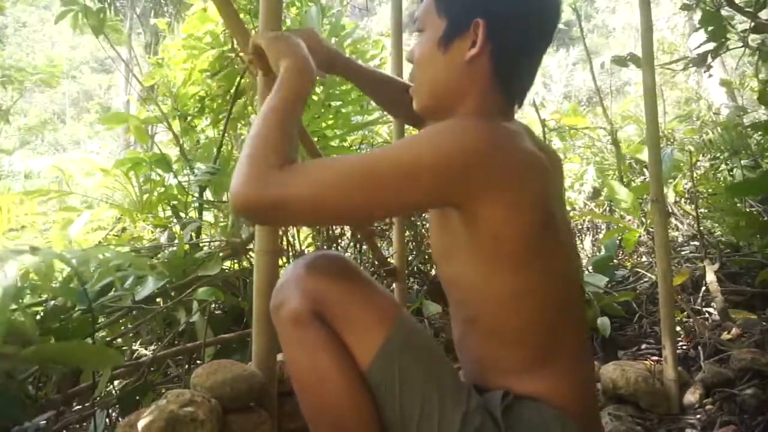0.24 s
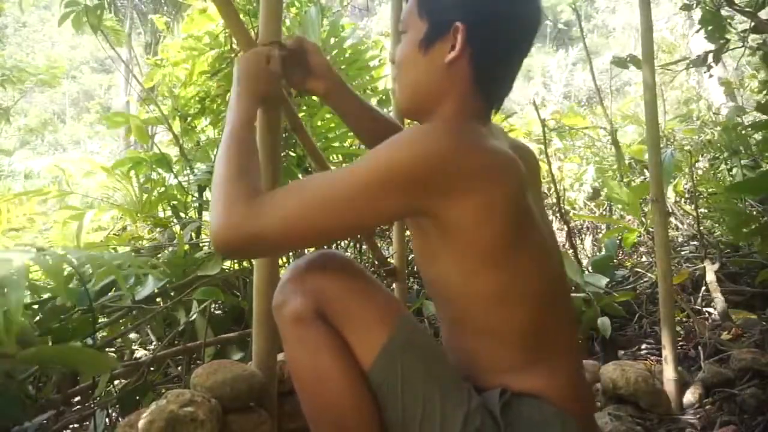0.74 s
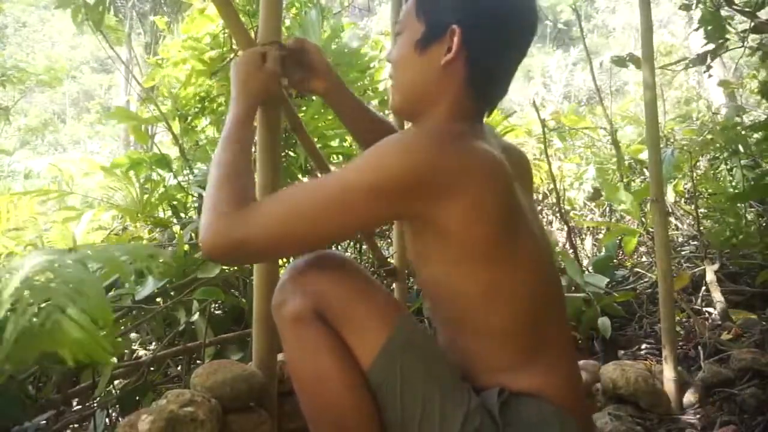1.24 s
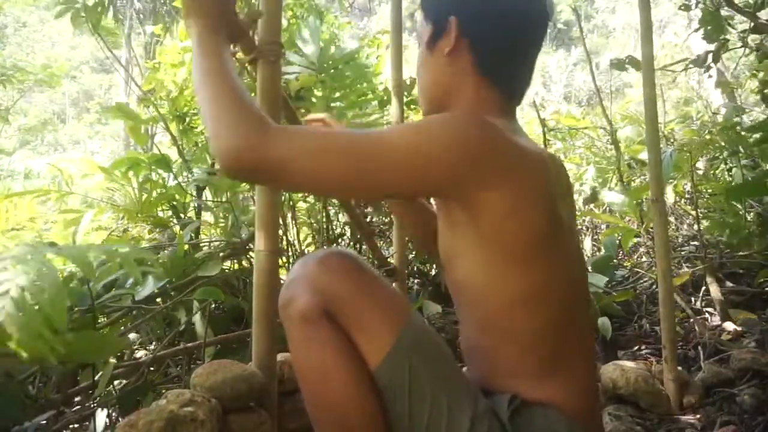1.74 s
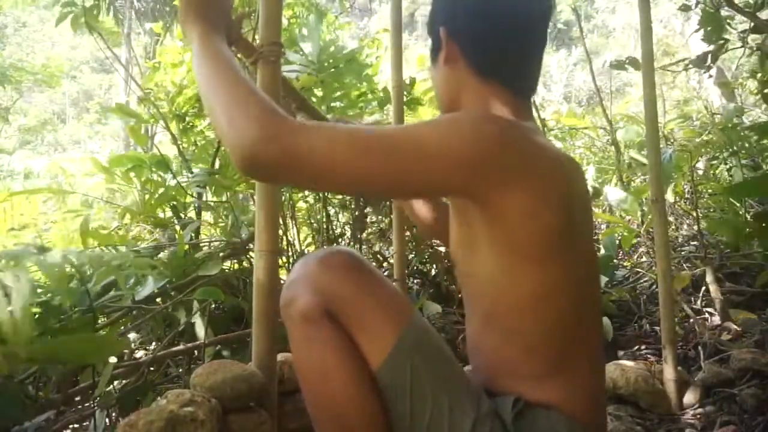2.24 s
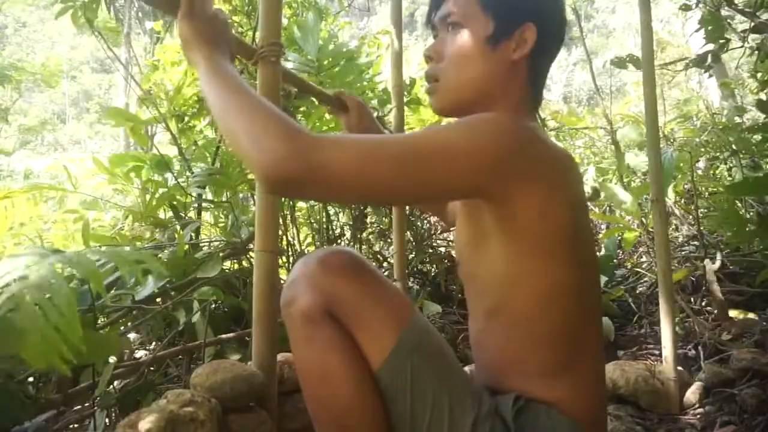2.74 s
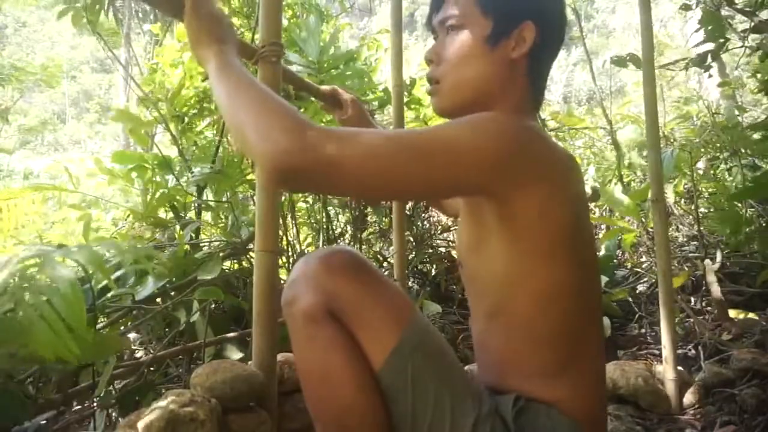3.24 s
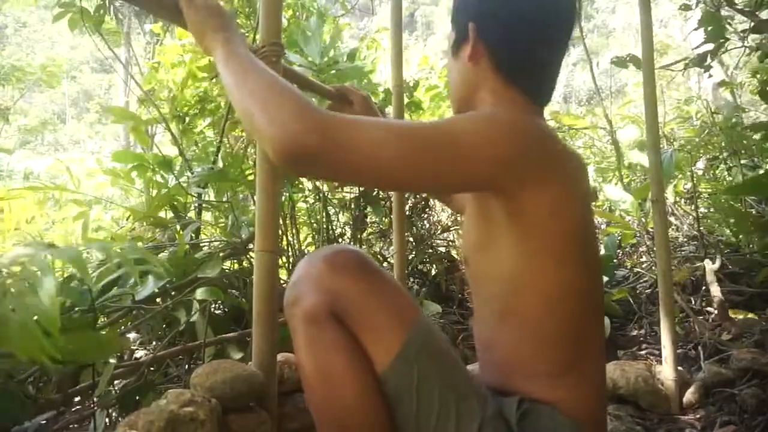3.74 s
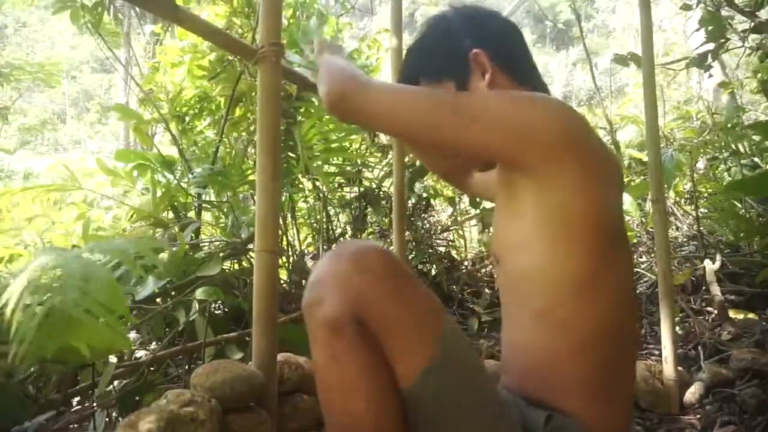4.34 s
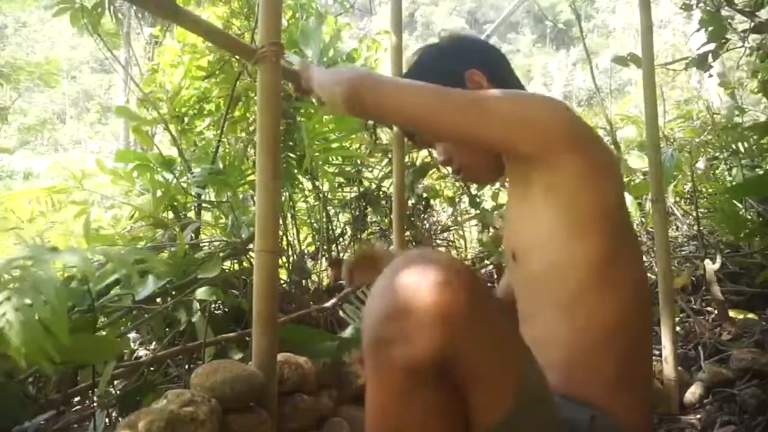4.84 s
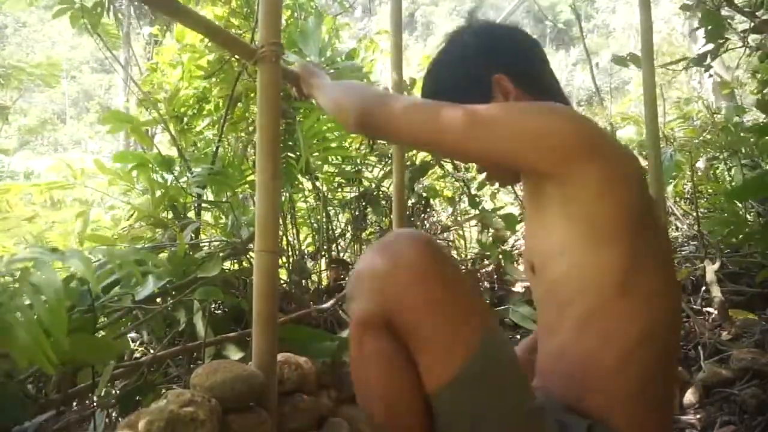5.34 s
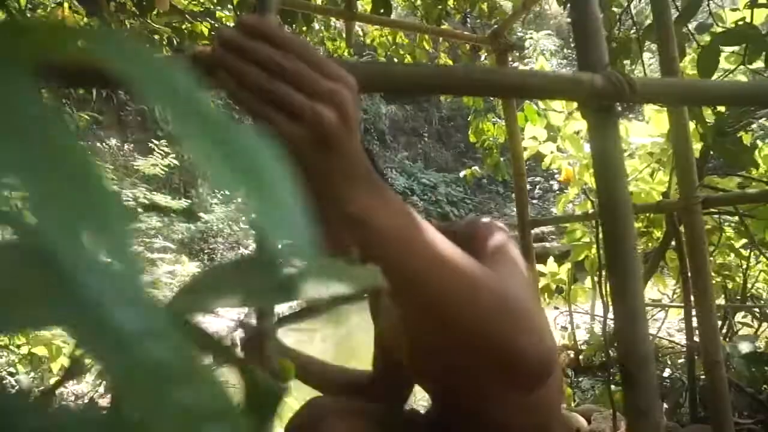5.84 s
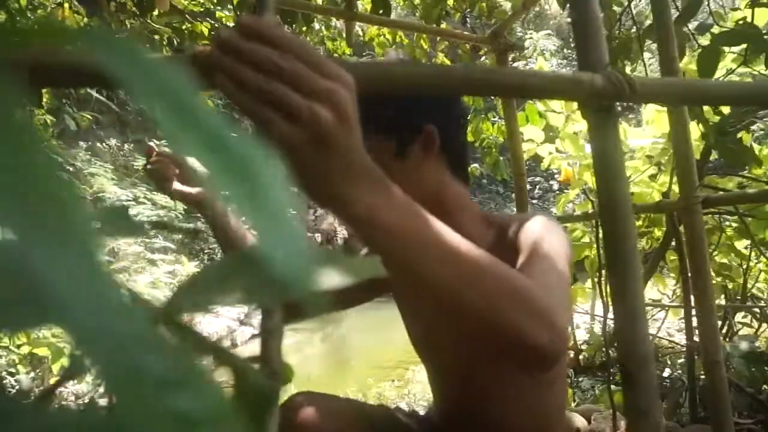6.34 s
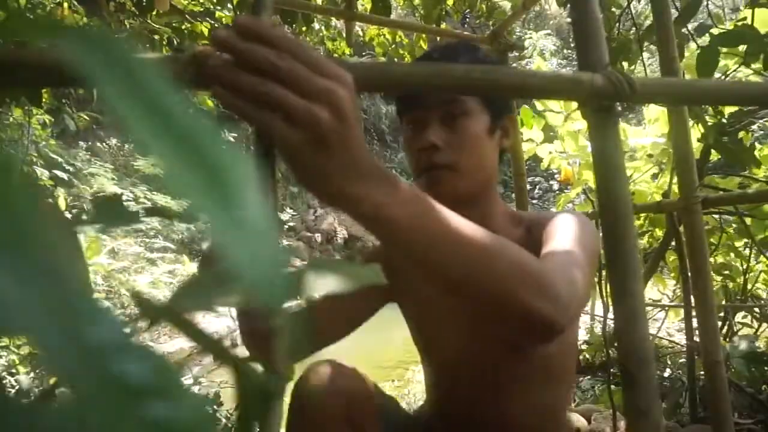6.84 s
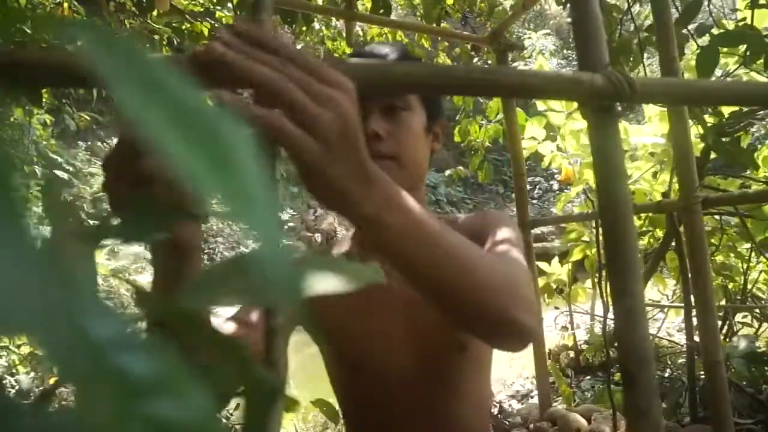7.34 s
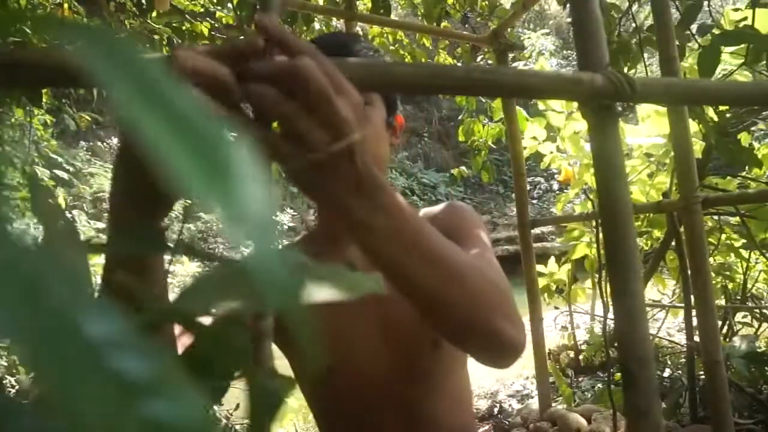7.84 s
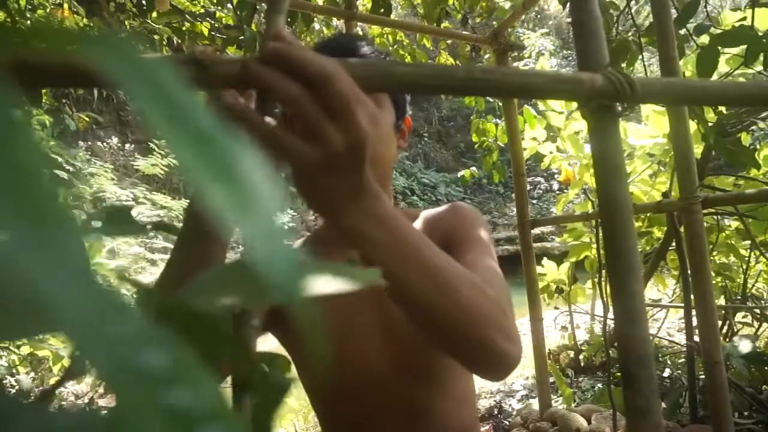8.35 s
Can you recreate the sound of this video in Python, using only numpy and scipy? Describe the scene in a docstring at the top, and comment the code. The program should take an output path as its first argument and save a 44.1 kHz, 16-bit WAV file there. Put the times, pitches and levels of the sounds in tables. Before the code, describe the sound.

A bright, gurgling stream runs throughout, swelling gently until about 4.3 s. Low puffs of air thump on the microphone in the first 0.2 s. Faint bamboo ticks come from 0.8 to 1.3 s. A binding strip rasps briefly at 1.9 s, harder with a rising groan at 2.0 s, then in a longer hissing pull from 2.3 to 2.95 s, with small knocks between. The loudest dry, hollow bamboo knock lands at 3.1 s with a leaf rustle, another at 3.6 s. A distant animal trills softly near 3.2 and 4.1 s. Leaves stir around 5 s and a foot scuffs grittily at 5.3-5.5 s. At 5.86 s the stream suddenly becomes softer, wider and farther right. Leaves crackle and twigs snap densely from 6.7 to 7.5 s, with a bamboo clack at 7.14 s. A lighter knock and another faint trill come at 7.8 s, then slight rustles over water until 8.6 s.

```python
"""Bamboo lashed by hand beside a forest stream

Struck poles ring as damped modes under noise cracks; a binding strip rasps in three strokes of stick-slip noise.
Dry leaves crackle as filtered random impulses, twigs snap as short noise bursts, and a foot drags on the litter.
A stream of noise and rising bubble tones turns softer, wider and further right at 5.86 s.
A far animal trills in pulsed tones, and puffs of air thump on the microphone as low-frequency noise."""
import sys
import numpy as np
from scipy import signal
from scipy.fft import rfft, irfft, next_fast_len
from scipy.io import wavfile
from scipy.ndimage import uniform_filter1d, map_coordinates

SR = 44100
rng = np.random.default_rng(int(sys.argv[2]) if len(sys.argv) > 2 else 0)


def bounce(signal):
    """Save signal as a 16-bit WAV file at the path given by the first command-line argument."""
    frames = np.transpose(np.atleast_2d(signal))
    limited = np.clip(frames, -1, 1)
    pcm = np.round(limited * 32767).astype(np.int16)
    wavfile.write(sys.argv[1], SR, pcm)


N = 378378

# spectrum of dry litter, for leaves, twigs and foot: f/Hz, relative spectral level/dB
LITTER = [(100, -54), (280, -45), (700, -9), (1400, -1), (2000, -6), (2700, 0.5), (3800, -5), (5500, -8.5),
          (8000, -8.5), (11000, -9.5)]


def amp(db):
    """Amplitude ratio from decibels: 20 dB per factor of ten."""
    return 10 ** (np.asarray(db) / 20)


def unit(x):
    """Normalisation to an rms of 1."""
    return x / np.sqrt(np.mean(x ** 2) + 1e-20)


def hold(x, span_s):
    """Normalisation to an rms of 1 over the onset alone."""
    x = unit(x)
    return x / np.sqrt(np.mean(x[:, :round(span_s * SR)] ** 2))


def since(s):
    """Time axis: seconds since time s, for every sample."""
    return np.arange(N) / SR - s


def bell(s, half_s):
    """Gaussian envelope of height 1 at time s, with standard deviation half_s."""
    return np.exp(-.5 * (since(s) / half_s) ** 2)


def surge(s, rise_s, fall_s):
    """Exponential growth to 1 at time s and exponential decay after it, given as time constants."""
    t = since(s)
    return np.exp(-np.minimum(np.maximum(-t / rise_s, t / fall_s), 20))


def wobble(rate):
    """Smooth random modulation of rms 1: a spline through rate random knots a second."""
    knots = rng.standard_normal(int(N * rate / SR) + 4)
    return unit(map_coordinates(knots, [np.arange(N) * rate / SR]))


def along(points, hz):
    """Interpolation of (f/Hz, value) points on a logarithmic frequency axis."""
    f, value = np.transpose(points)
    return np.interp(np.log(hz + 1), np.log(f), value)


def filtered(x, response):
    """Linear filtering: the spectrum is multiplied by a response of frequency."""
    n = x.shape[-1]
    padded = next_fast_len(n + SR // 8)
    return irfft(rfft(x, padded) * response(np.fft.rfftfreq(padded, 1 / SR)), padded)[..., :n]


def band(x, edge_hz, kind):
    """Causal third-order Butterworth low, band or high pass."""
    return signal.sosfilt(signal.butter(3, edge_hz, kind, fs=SR, output="sos"), x)


def spread(pair, spectrum, width=1):
    """Partial coherence: two unrelated signals mix as mid and side into coloured stereo of rms 1."""
    # left-right correlation at width 1: f/Hz, correlation
    likeness = [(60, 0.85), (130, 0.81), (270, 0.69), (580, 0.56), (1220, 0.38), (2600, 0.67),
                (5520, 0.025), (11700, 0.7)]

    def mid_side(hz):
        angle = width * np.arccos(np.clip(along(likeness, hz), -1, 1)) / 2
        return amp(along(spectrum, hz)) * np.array([np.cos(angle), np.sin(angle)])

    mid, side = filtered(pair, mid_side)
    return unit(np.array([mid + side, mid - side]))


def ticks(rate, scatter_db):
    """Shot noise: two random trains of impulses of uneven size, rate a second."""
    present = rng.random((2, N)) < rate / SR
    size = rng.standard_normal((2, N)) * amp(scatter_db * rng.standard_normal((2, N)))
    return unit(present * size)


def narrow(hz, width_hz, side_share):
    """Narrow-band noise: slow complex noise shifted up to the frequency curve hz."""
    drive = rng.standard_normal((2, N)) + 1j * rng.standard_normal((2, N))
    slow = signal.sosfilt(signal.butter(2, width_hz / 2, fs=SR, output="sos"), drive)
    mid, side = np.real(slow * np.exp(2j * np.pi * np.cumsum(hz * np.ones(N)) / SR))
    return unit(np.array([mid + side_share * side, mid - side_share * side]))


def resonant(x, modes):
    """Modal filtering: a body's (f/Hz, bandwidth/Hz, level/dB) resonances in parallel, at rms 1."""
    def body(f):
        total = 0
        for k, (centre, width, db) in enumerate(modes):
            peak = 1j * f * width / (centre * centre - f * f + 1j * f * width)
            total = total + (-1) ** k * amp(db) * peak  # neighbours in opposite phase
        return total

    return unit(band(filtered(x, body), 1340, "high"))


def patchy(x, depth_db):
    """Time-frequency modulation: narrow bands swell and fade as the contact moves."""
    z = signal.stft(x, nperseg=512)[2]
    field = uniform_filter1d(rng.standard_normal(z.shape[1:]), size=3, axis=0)
    field = uniform_filter1d(field, size=13, axis=1)
    return unit(signal.istft(z * amp(depth_db * unit(field)), nperseg=512)[1][:, :N])


def add(track, s, sound):
    """Superposition of a sound onto a track at time s."""
    part = track[:, round(s * SR):][:, :sound.shape[-1]]
    part += sound[..., :part.shape[-1]]


def poles():
    """Modal impact: each blow cracks and rings the cane, and the hands damp it more or less."""
    # blows on the poles: t/s, level/dB, hollow low ring/dB, splintery treble/dB, decay T60/s,
    # note of the struck spot f/Hz, left over right/dB
    blows = [(0.793, -37, -22, -8, 0.011, 2250, 0), (0.893, -33, -15, -29, 0.02, 2850, -1),
             (.9501, -40, -7, -10, 0.024, 4000, 0), (1.075, -29.5, -9, -10, 0.026, 3100, 1),
             (1.286, -37.5, -13, -2, 0.016, 4540, -5), (2.0392, -26, -15, -18, 0.0075, 2290, 0),
             (2.331, -33, -8.5, -16, 0.027, 2370, 0), (3.139, -14.5, -2.5, -24, 0.043, 2590, 3),
             (3.5889, -20, -7, -9.5, 0.058, 3720, 0.5), (4.558, -34.5, -15, -16, 0.11, 5500, 0),
             (5.945, -38, -11, -6.5, 0.046, 2290, 0), (7.1361, -20.5, -14.5, -9.5, 0.0096, 2510, 0.5),
             (7.1518, -33, -7, 3.5, 0.037, 2700, 0), (7.245, -32.5, -20, 0.5, 0.022, 3860, 0),
             (7.3366, -40, -9, 9.5, 0.037, 2450, 1), (7.811, -27, -8, -3, 0.026, 2100, -1)]
    # modes of the hollow cane: f/Hz, mean level/dB, ring time as a share of the blow's T60
    cane_modes = [(287, -17.5, 1.5), (413, -21, 3), (755, -2, 1.44), (940, 5, 0.81), (1090, 2.5, 1.04),
                  (1277, 2.5, 0.96), (1633, 3, 0.65), (2002, 8.5, 2.2), (2260, 20, 1.1), (2424, 16, 1.1),
                  (2630, 18, 1.1), (2737, 17, 0.47), (2953, 15, 1.04), (3720, 19.5, 0.74), (4280, -26, .8)]
    # noise of the crack: f/Hz, relative spectral level/dB
    crack_spectrum = [(150, -23), (500, -7.5), (1200, -14.5), (2500, 7), (4000, 1), (5200, -0.5),
                      (7000, -16), (8500, -10.5), (10600, -14)]
    out, t = np.zeros((2, N)), np.arange(SR // 5) / SR
    strength = lambda x: hold(x, span_s=.01)
    hz, mode_db, share = np.transpose(cane_modes)[:, :, None]
    for s, db, hollow_db, splinter_db, t60, spot_hz, pan_db in blows:
        size = amp(mode_db + rng.normal(0, 1.5, hz.shape))
        # phases differ slightly between left and right
        phase = rng.uniform(0, 2 * np.pi, hz.shape) + rng.normal(0, 0.14, (2, len(hz), 1))
        modes = size * amp(-60 * t / (t60 * share)) * np.sin(2 * np.pi * hz * t + phase)
        ring = np.sum(modes, axis=1)
        crack = spread(rng.standard_normal((2, len(t))), crack_spectrum, width=0.87) * amp(-60 * t / t60)
        # a longer contact also takes longer to build up
        build = 1 - np.exp(-t / (.015 * t60))
        blow = (strength(ring) + 1.06 * strength(crack)) * build
        # only a heavy blow reaches the deepest modes
        lowest_hz = np.interp(db, [-22, -16], [640, 330])
        hollow = band(blow, [lowest_hz, 1450], "band")
        wall = band(blow, [1600, 3700], "band")
        spot = band(crack, [spot_hz * .92, spot_hz * 1.08], "band")
        splinter = band(crack, 6000, "high")
        sound = 0.74 * strength(wall) + 0.51 * strength(spot)
        sound = sound + amp(hollow_db) * strength(hollow) + amp(splinter_db) * strength(splinter)
        add(out, s, amp(db + np.array([[pan_db], [-pan_db]]) / 2) * sound)
    return out


def strip():
    """Stick-slip friction: catching fibres excite the cane while the strip is hauled round the joint."""
    # slack taken up, a hard haul, the tail drawn through: t/s, length/s, rasp level/dB,
    # rasp change over the stroke/dB, hiss level/dB, hiss change/dB, groan level/dB, starting f/Hz, rise/Hz
    strokes = [(1.878, 0.11, -34.5, -36, -41.5, 0, -70, 2300, -2),
               (2.035, 0.28, -33.5, 10, -30.5, 1, -34.5, 1880, 760),
               (2.34, .61, -52, 19.5, -33.5, -6, -60, 2290, 199.5)]
    # noise of the fibres: f/Hz, relative spectral level/dB
    fibre_spectrum = [(200, -41), (600, -13), (1200, -10), (2000, -5), (3300, -7.5), (4700, -1.5),
                      (6500, -8), (8500, -6.5), (10600, -3.5)]
    # resonances of the cane under the strip: f/Hz, bandwidth/Hz, level/dB
    rubbed_modes = [(1290, 150, -12), (1790, 140, -6), (2205, 80, 6), (2590, 230, 5), (3220, 450, 2.5),
                    (3840, 500, -4), (4370, 150, -7.5), (5430, 200, -31)]
    grip_s, let_go_share = 0.0069, 0.28  # a stroke bites at once and eases off over its last part
    groan_fade_db = 12  # the pole groans less as the strip tightens over a stroke
    rasp_gain, hiss_gain, groan_gain, hz = np.zeros((4, N))
    for s, length, rasp_db, rasp_change_db, hiss_db, hiss_change_db, groan_db, start_hz, rise_hz in strokes:
        tension = np.clip(since(s) / length, 0, 1)
        grip = np.clip(since(s) / grip_s, 0, 1)
        sliding = grip * np.sqrt(np.clip((1 - tension) / let_go_share, 0, 1))
        rasp_gain = rasp_gain + sliding * amp(rasp_db + rasp_change_db * tension)
        hiss_gain = hiss_gain + sliding * amp(hiss_db + hiss_change_db * tension)
        groan_gain = groan_gain + sliding * amp(groan_db - groan_fade_db * tension)
        hz = np.where((since(s) > 0) | (hz == 0), start_hz + rise_hz * tension, hz)
    catch = amp(0.65 * wobble(110))

    def fibres():
        scrape = spread(ticks(rate=12000, scatter_db=-2.0), fibre_spectrum, width=0.7)
        return patchy(scrape, depth_db=4.5)

    free_length = narrow(hz, width_hz=430, side_share=.35)
    rasp = unit(band(free_length, 1350, "high") + 1.8 * resonant(fibres(), rubbed_modes))
    groan = narrow(hz=1366, width_hz=170, side_share=0.23)
    return catch * (rasp_gain * rasp + hiss_gain * fibres() + groan_gain * groan)


def stirring():
    """Incoherent addition: the rustles' envelopes add in power to one measure of leaf movement."""
    # leaves brushed by the body or shaken by the poles: peak t/s, level/dB, rise and fall time constants/s
    rustles = [(3.15, -32, .005, .07), (4.95, -42, .35, 0.38), (5.33, -37, .045, .05),
               (6.774, -35, .03, .04), (6.9, -35.5, .018, .19), (7.035, -34.5, .015, .05),
               (7.14, -30.5, .035, .2), (7.375, -39, .01, .1), (7.66, -41, .035, 0.038),
               (8.26, -45, .05, .07), (8.5, -48.5, 0.092, .3)]
    return np.sqrt(sum((amp(db) * surge(s, rise, fall)) ** 2 for s, db, rise, fall in rustles))


def leaves():
    """Crackling noise: fine and sharper random impulses in clumps over a soft brushing noise."""
    fine, sharp = ticks(rate=3000, scatter_db=1), ticks(rate=400, scatter_db=0)
    crackle = fine + .7 * sharp + .6 * rng.standard_normal((2, N))
    return stirring() * amp(2.4 * wobble(80)) * patchy(spread(crackle, LITTER), depth_db=3.0)


def small_snaps(count):
    """Random events of varying rate: lesser snaps fall most often where the leaves move hardest."""
    body_over_db, treble_over_db, scatter_db = 15, -1, 1.5  # first two relative to the rustle
    stir = stirring()
    work_done = np.cumsum(stir ** 2) / np.sum(stir ** 2)
    share = (np.arange(count) + rng.random(count)) / count
    at = np.searchsorted(work_done, share).clip(0, N - 1)
    db = 20 * np.log10(stir[at]) + scatter_db * rng.standard_normal(count)
    return list(zip(at / SR, db + body_over_db, db + treble_over_db))


def twigs():
    """Brittle fracture: short dry noise bursts that decay without a ring."""
    # the loudest snaps, levels ahead of the mixing gains: t/s, body level/dB, treble level/dB
    loud_snaps = [(2.7226, -18, -45), (6.7358, -16, -38), (6.8264, -21, -36), (6.887, -19, -44),
                  (7.0257, -12.5, -32), (7.106, -15.5, -32), (7.1968, -16.5, -38), (7.2087, -22, -26),
                  (7.2249, -21, -31), (7.3038, -19, -42), (7.3738, -16, -46), (7.4687, -18, -38)]
    out, t = np.zeros((2, N)), np.arange(SR // 16) / SR
    for s, db, treble_db in [*loud_snaps, *small_snaps(count=26)]:
        burst = spread(rng.standard_normal((2, len(t))), LITTER, width=0.79)
        body = unit(band(burst, [500, 4500], "band")) * amp(-60 * t / 0.028)  # T60 in s
        treble = unit(band(burst, 6100, "high")) * amp(-60 * t / 0.041)
        add(out, s, 0.22 * amp(db) * body + 0.92 * amp(treble_db) * treble)
    return out


def foot():
    """Granular friction: a foot's gritty, slightly squeaky drag excites resonances of the litter."""
    # drags over the litter: t/s, level/dB, standard deviation in time/s
    drags = [(5.323, -37, 0.054), (5.5, -40.5, 0.024)]
    # resonances of the litter under the foot: f/Hz, bandwidth/Hz, level/dB
    scuff_modes = [(2580, 110, 5), (3040, 200, 1), (4000, 310, 3.5), (4600, 180, -10), (4760, 240, 5),
                   (8100, 320, 1.5), (10030, 400, -2), (10160, 300, 4.5)]
    pressure = sum(amp(db) * bell(s, half) for s, db, half in drags)
    grit = spread(ticks(rate=4000, scatter_db=1), LITTER)
    return pressure * amp(1.7 * wobble(60)) * resonant(grit, scuff_modes)


def nearby(x):
    """Comb filtering: early reflections from poles and stones give fixed peaks and dips."""
    # reflections: delay at left t/s, delay at right t/s, gain
    reflections = [(.0019, .0021, 0.052), (.0034, .0033, 0.0099), (.0056, .0058, .25), (.0093, .0088, 0.14)]
    out = x.copy()
    for left_s, right_s, gain in reflections:
        out += gain * np.array([np.roll(side, round(d * SR)) for side, d in zip(x, (left_s, right_s))])
    return out / np.sqrt(1 + np.sum(np.transpose(reflections)[2] ** 2))


def forest(x):
    """Diffuse scattering: stems and foliage add a short tail whose decay depends on frequency."""
    # reverberation: f/Hz, T60/s
    decay = [(200, 0.27), (1000, 0.06), (2700, 0.1), (6000, 0.24), (11000, 0.072)]
    hz, t, z = signal.stft(rng.standard_normal((2, SR // 2)), SR, nperseg=256)
    tail = signal.istft(z * amp(-60 * t / along(decay, hz)[:, None]), SR, nperseg=256)[1]
    return signal.fftconvolve(x, tail / np.linalg.norm(tail[0]), axes=1)[:, :N]


def bubbles(count, pitch_hz, cycles):
    """Bubble resonance: small bubbles ring briefly with rising pitch, starting at pitch_hz to 6 pitch_hz."""
    out, t = np.zeros((2, N)), np.arange(SR // 50) / SR
    for when, size, side, pitch in rng.random((count, 4)):
        hz = pitch_hz * 6 ** pitch
        age = t * hz / cycles
        tone = age * np.exp(-3 * age) * np.sin(2 * np.pi * hz * t * (1 + 0.061 * age))
        add(out, when * (N - 1) / SR, size ** 3 * np.array([[side], [1 - side]]) * tone)
    return unit(out)


def water(levels, splash_db, width, gurgle_right_db, splash_right_db):
    """Turbulent flow noise with entrained bubbles: the splash swells less than the gurgle."""
    # f/Hz, relative spectral level/dB
    gurgle_spectrum = [(25, -58), (60, -29), (140, -23.5), (220, -19), (300, -7.5), (400, -0.5), (600, 1),
                       (1200, 3.5), (1700, -3), (3000, -8.5), (6000, -51)]
    splash_spectrum = [(100, -66), (400, -35), (1000, -23), (1600, -6.5), (2300, -3), (2750, -4),
                       (3300, -6.5), (4500, -9), (6500, -14.5), (9000, -17), (11000, -19)]
    gurgle_db, splash_follows = 2, 0.42  # gurgle over the level; share of the swell the splash follows
    level_db = np.interp(since(0), *np.transpose(levels))
    swell_db = level_db - np.mean([db for s, db in levels])

    def flow(spectrum, right_db):
        noise = rng.standard_normal((2, N)) + 0.33 * ticks(rate=1500, scatter_db=2.5)
        return amp([[-right_db], [right_db]]) * spread(noise, spectrum, width)

    gurgle = flow(gurgle_spectrum, gurgle_right_db) + 0.27 * bubbles(count=2500, pitch_hz=415.6, cycles=9.3)
    splash = flow(splash_spectrum, splash_right_db)
    gurgle_gain = amp(level_db + gurgle_db + 0.95 * wobble(14))
    splash_gain = amp(splash_db + splash_follows * swell_db + 0.7 * wobble(11))
    return gurgle_gain * gurgle + splash_gain * splash


def stream():
    """Equal-power crossfade: from the second listening spot the stream is softer, wider and to the right."""
    # base level of the water at each spot: t/s, level/dB
    first_levels = [(0.4, -50), (1.86, -48.5), (2.12, -47), (4.3, -44), (5.6, -46.5)]
    second_levels = [(5.9, -52.5), (8.58, -50)]
    move_s, fade_s = 5.86, .01
    moved = np.clip(since(move_s) / fade_s, 0, 1) * np.pi / 2
    first = water(first_levels, splash_db=-39.0, width=1.0, gurgle_right_db=0.5, splash_right_db=0)
    second = water(second_levels, splash_db=-42.5, width=1.2, gurgle_right_db=1.9, splash_right_db=0.56)
    return np.cos(moved) * first + np.sin(moved) * second


def trill():
    """Amplitude modulation: soft hoots roll, strong and weak in turn, half blurred by the trees."""
    # a far animal's calls: peak t/s, level/dB, top f/Hz
    calls = [(3.2, -51.5, 770), (4.08, -47, 744.6), (7.82, -47.5, 790)]
    rise_s, fall_s = .32, .8  # time constants
    climb_hz_per_s, sag_hz_per_s = 160, 90
    gains = np.array([amp(db) * surge(s, rise_s, fall_s) for s, db, _ in calls])
    # each call climbs as it swells and sags as it fades
    peak_s, _, top_hz = np.array(calls)[gains.argmax(axis=0)].T
    hz = top_hz - np.maximum(-climb_hz_per_s * since(peak_s), sag_hz_per_s * since(peak_s))
    beat = 28.8 * since(0) + .06 * wobble(9)  # hoots a second, slightly uneven
    roll = np.sin(np.pi * beat) ** 4 * (1 + .4 * np.sin(np.pi * beat))
    phase = 2 * np.pi * np.cumsum(hz * (1 + 0.0152 * wobble(30))) / SR
    hoots = unit(roll * np.sin(phase))
    blur = narrow(hz, width_hz=110, side_share=.7)
    return gains.max(axis=0) * (.72 * hoots + .7 * blur)


def puffs():
    """Turbulent pressure: eddies thump on the microphone, loosely correlated between left and right."""
    # puffs of air: t/s, level/dB, standard deviation in time/s
    gusts = [(0.094, -34, .016), (0.152, -24.5, 0.017), (.19, -43, 0.086), (1.378, -50.5, 0.022),
             (1.642, -50.5, 0.032), (2.304, -66, .05), (2.854, -48, 0.015), (4.164, -67, .044)]
    # noise of the eddies: f/Hz, relative spectral level/dB
    eddy_spectrum = [(25, -32), (60, -17), (125, -1), (280, 0), (400, -10.5), (650, -20), (1500, -54)]
    out = np.zeros((2, N))
    flutter = amp(4 * wobble(70))  # a puff arrives in uneven lumps
    eddies = spread(rng.standard_normal((2, N)), eddy_spectrum, width=1.6) * flutter
    for s, db, half in gusts:
        swell = bell(s, half)
        puff = swell * eddies
        out += amp(db) * puff * np.sqrt(np.mean(swell ** 2) / np.mean(puff ** 2))
    return out


def scene():
    """Superposition of the close handwork, its scattered tail and the sounds around it."""
    work = poles() + foot() + nearby(strip() + leaves() + twigs())
    return work + amp(-5.5) * forest(work) + stream() + trill() + puffs()


def record(dry):
    """Band limitation: the deepest bass is thinned and nothing is kept from the top limit up."""
    top_hz = 11120
    return filtered(band(dry, 45, "high"), lambda hz: hz < top_hz)


dry = scene()
out = record(dry)
bounce(out)
```